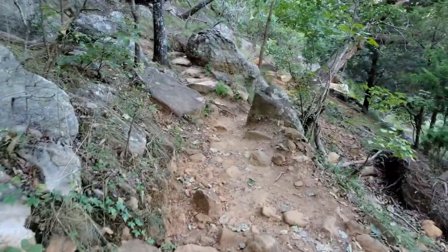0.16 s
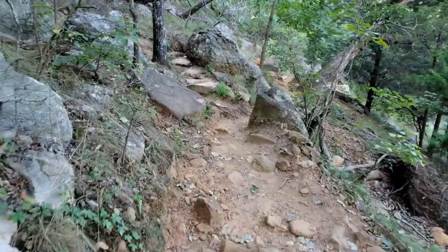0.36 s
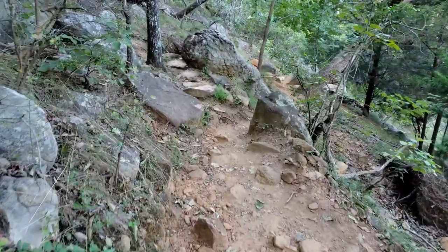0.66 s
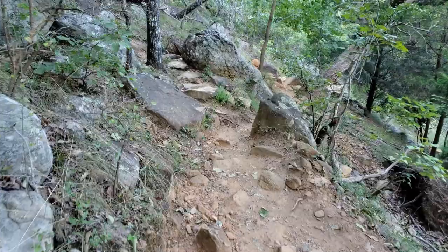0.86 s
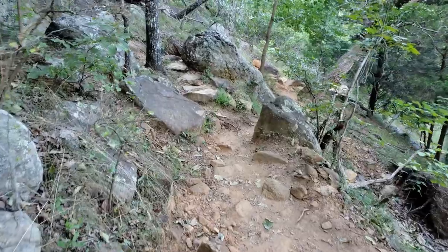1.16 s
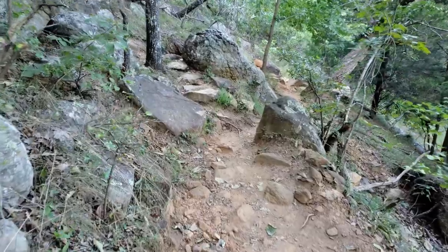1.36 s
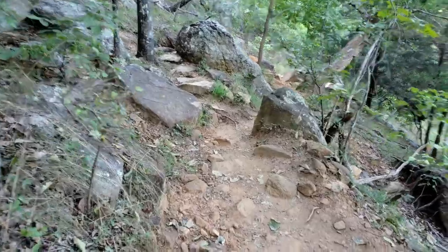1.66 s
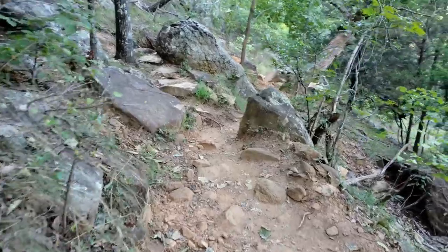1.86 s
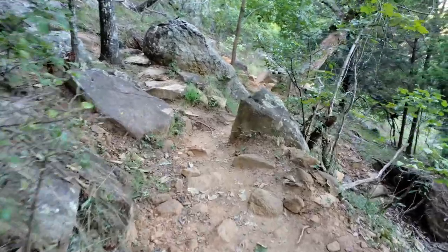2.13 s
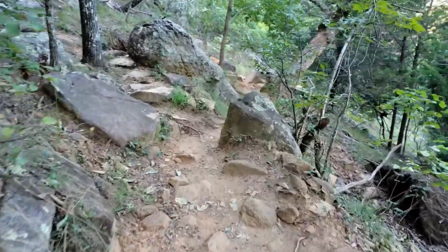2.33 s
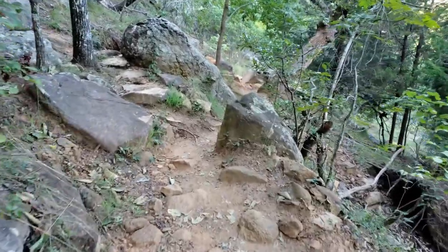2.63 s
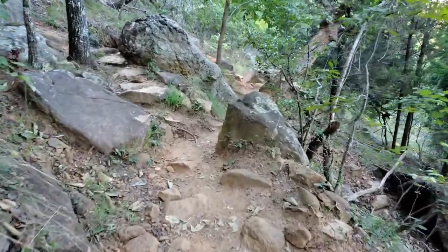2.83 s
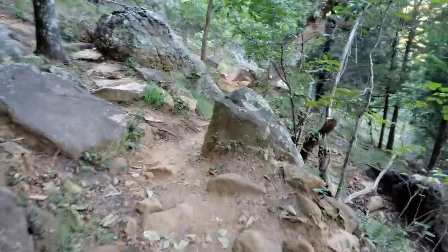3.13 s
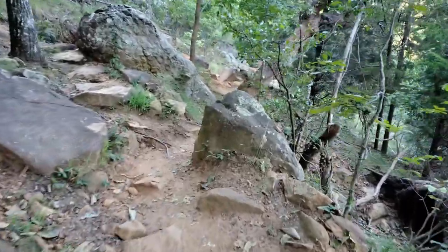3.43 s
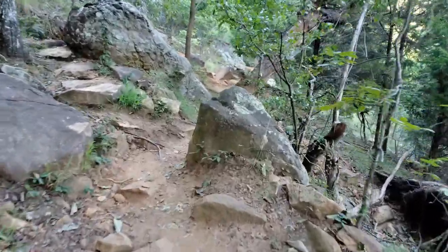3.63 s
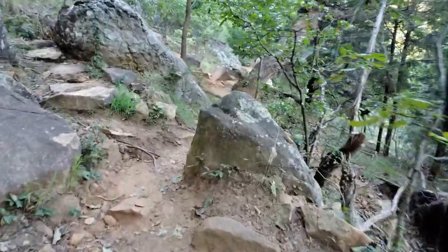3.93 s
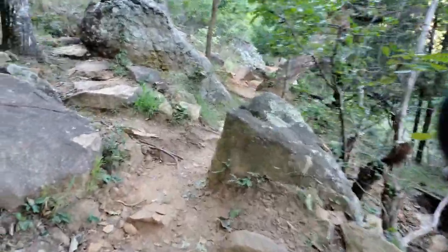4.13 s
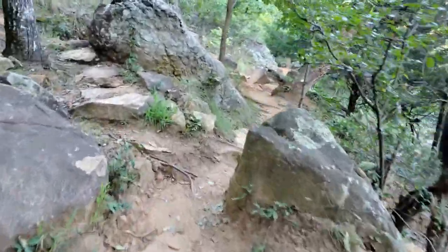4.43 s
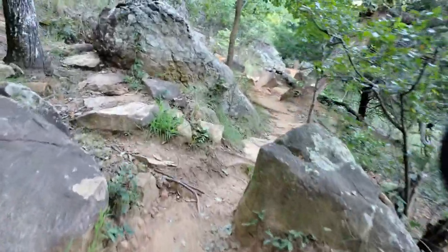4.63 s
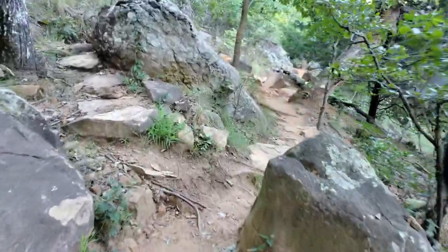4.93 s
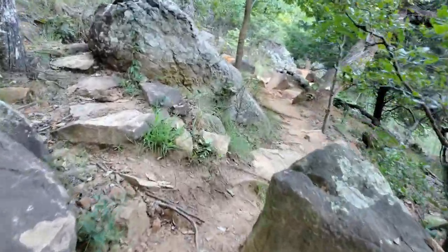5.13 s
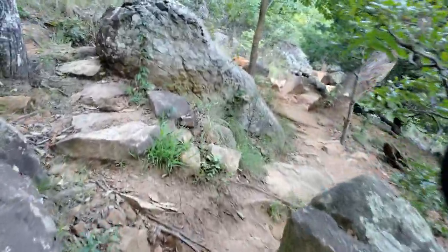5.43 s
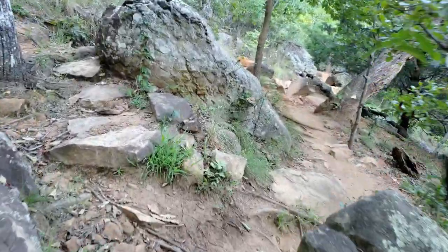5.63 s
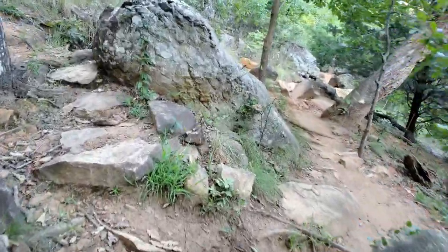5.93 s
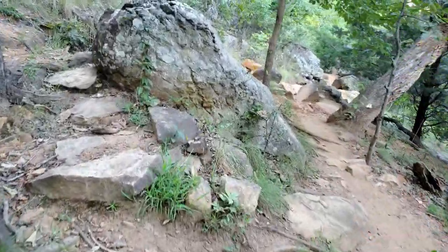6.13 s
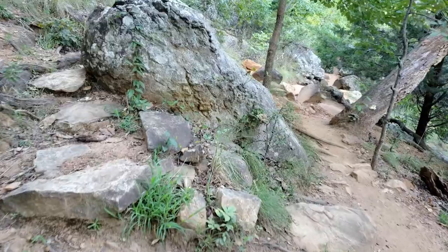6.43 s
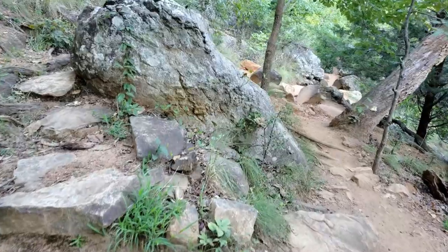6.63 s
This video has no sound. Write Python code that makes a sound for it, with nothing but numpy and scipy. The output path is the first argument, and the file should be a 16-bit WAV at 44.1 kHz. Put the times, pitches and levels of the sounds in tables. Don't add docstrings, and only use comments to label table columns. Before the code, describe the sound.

Songbirds whistle gliding notes and quick trills through echoing woods while boots crunch over gritty soil, gravel and knocking stones.

```python
import sys
import numpy as np
from scipy import signal
from scipy.fft import rfft, irfft, next_fast_len
from scipy.io import wavfile
from scipy.ndimage import uniform_filter1d

SR = 44100
rng = np.random.default_rng(int(sys.argv[2]) if len(sys.argv) > 2 else 0)


def pcm_store(signal):
    levels = np.round(np.clip(np.atleast_2d(signal), -1, 1) * 32767)
    wavfile.write(sys.argv[1], SR, levels.astype(np.int16).T)


def attenuation_scalar(level_db):
    decades = np.asarray(level_db, float) / 20
    return 10 ** decades


N = 298746


def birds():
    direct, echo = np.zeros((2, N)), np.zeros(N)
    leaves = wander(count=4, size=130)
    short_notes(direct, echo, leaves)
    figures(direct, echo, leaves)
    repeated_syllables(direct, echo, leaves)
    far_buzz(echo)
    return direct + forest(echo)


def short_notes(direct, echo, leaves):
    near_held = [(0.756, 0.049, 4794, 4750, -42), (0.853, 0.039, 4716, 4640, -30.5),
                 (1.278, 0.07, 4740, 4557, -30), (1.385, 0.075, 4600, 4546, -27)]
    near_flicks = [(1.485, 0.057, 4605, 5090, -27), (1.593, .04, 4497, 5470, -25),
                   (1.685, 0.046, 4496, 5230, -25.5)]
    near_falls = [
        (1.938, 0.029, 4364, 4330, -21.5),
        (1.975, 0.0253, 4300, 3540, -24),
        (2.068, 0.037, 4450, 5810, -31),
    ]
    right_held = [(3.588, 0.063, 4740, 4460, -41.5), (6.387, 0.071, 7750, 7490, -50)]
    right_drops = [(3.41, 0.127, 7356, 6080, -44), (6.614, 0.1, 7590, 6510, -51.5)]
    right_strokes = [(1.654, .062, 7180, 6880, -49), (5.973, .022, 5670, 5580, -53),
                     (1.921, 0.033, 7350, 5430, -46), (2.255, 0.027, 7330, 6490, -50),
                     (2.319, 0.022, 4700, 3580, -52), (4.45, 0.025, 5460, 3740, -43),
                     (4.832, 0.028, 8380, 7250, -49), (6.16, 0.021, 4800, 3610, -49.5),
                     (6.468, 0.027, 7420, 6760, -49.5)]
    deep_middle = [(0.47, 0.09, 8650, 8480, -69), (0.38, 0.18, 7650, 7800, -74),
                   (0.709, 0.04, 6590, 6500, -51.5), (0.87, 0.074, 2710, 2750, -61),
                   (3.668, 0.022, 2960, 3040, -48), (3.695, 0.03, 3450, 4100, -40.5),
                   (4.405, 0.0197, 4100, 3260, -40.5), (4.434, 0.019, 3200, 3000, -44),
                   (4.365, 0.034, 5200, 5000, -57), (6.656, 0.027, 5360, 4800, -55)]
    deep_left = [(1.678, 0.027, 3620, 3850, -53), (1.811, 0.048, 3673, 3556, -44.5)]
    # bend (power of time), swell_db (start to end), left_right_db, echo_db
    manners = [
        (0.42, -3.5, -1.5, -3.5),
        (2.62, 2.5, -1, -4.5),
        (1, -5, 3.5, -5.5),
        (0.53, -1, -11, 3),
        (3.2, 11, -23, 5),
        (1.1, 8.5, -14, -1),
        (1.12, 3.5, 1.5, 6),
        (0.94, -3, 15, -4),
    ]
    kinds = [near_held, near_flicks, near_falls, right_held, right_drops, right_strokes, deep_middle, deep_left]
    for notes, (bend, swell_db, pan_db, echo_db) in zip(kinds, manners):
        for note in notes:
            whistle(direct, echo, leaves, glide(*note, bend, swell_db), pan_db, echo_db)


def figures(direct, echo, leaves):
    # time_s, pitch_hz, level_db
    slide = [(.995, 8610, -45), (1.012, 8556, -42.5), (1.08, 8320, -32), (1.16, 7820, -32.5),
             (1.205, 7640, -37), (1.219, 7605, -28.5), (1.24, 7510, -40)]
    arch = [(5.92, 7900, -52), (5.933, 7440, -43), (5.975, 7760, -37), (6.0, 7750, -44), (6.025, 7170, -45)]
    dip = [(6.233, 6390, -54), (6.244, 6700, -41.5), (6.263, 5590, -41), (6.284, 5500, -43.5),
           (6.303, 5960, -43), (6.329, 5940, -47)]
    hook = [(4.256, 6050, -49), (4.272, 6630, -37.5), (4.287, 6860, -32), (4.316, 7130, -41),
            (4.365, 7370, -43.5), (4.39, 7460, -40.5)]
    plateau = [(4.601, 6040, -46), (4.616, 6190, -40), (4.644, 6293, -38.5), (4.686, 6280, -44)]
    sag = [(6.077, 4380, -47), (6.093, 4190, -48), (6.11, 3970, -48), (6.129, 3880, -50),
           (6.155, 3910, -59)]
    arched = [(.59, 2103, -58), (0.629, 2160, -55.5), (0.669, 2247, -53), (0.711, 2177, -64),
              (.8, 2180, -62)]
    droop = [(1.0, 2690, -60), (1.071, 2614, -65), (1.15, 2620, -64), (1.23, 2634, -52.5),
             (1.28, 2575, -60), (1.35, 2530, -63)]
    crest = [(1.772, 5380, -34), (1.795, 5810, -37.5), (1.82, 6240, -32), (1.848, 6124, -33),
             (1.87, 5950, -48), (1.914, 5750, -40)]
    low_pair = [(3.082, 2690, -53), (3.112, 2630, -53), (3.126, 2650, -64), (3.14, 2634, -55),
                (3.155, 2660, -57)]
    falling_hold = [(3.202, 7240, -42), (3.217, 6970, -34.5), (3.25, 7110, -40), (3.284, 7070, -43),
                    (3.314, 6600, -37.5), (3.344, 5870, -45)]
    # left_right_db, echo_db
    places = [(-12, 0.5), (-11.5, -5.5), (-23, 0), (-21.5, 3.5), (-16.5, -1), (-17, 3), (-8, 4),
              (8.5, -2.5), (-1.5, -4), (2, -4), (-22, 5)]
    sung = [slide, arch, dip, hook, plateau, sag, arched, droop, crest, low_pair, falling_hold]
    for rows, (pan_db, echo_db) in zip(sung, places):
        whistle(direct, echo, leaves, rows, pan_db, echo_db)


def repeated_syllables(direct, echo, leaves):
    # time_s, pitch_hz, level_db
    quick_sweep = [(0.0, 7710, 5), (0.015, 7640, 0), (0.03, 7030, 5), (0.045, 5640, 10), (0.065, 4400, 6.5),
                   (0.08, 3680, 3)]
    wide_sweep = [(0.0, 7950, -8), (0.012, 8250, -5), (0.024, 8120, -4), (0.045, 7100, 3), (0.056, 5820, 7),
                  (0.069, 4850, 0.5), (0.08, 4380, -1), (0.086, 4200, 9)]
    rise = [(0.0, 3076, 1), (0.02, 3140, 0.5), (0.036, 3600, 6.5), (0.05, 4050, 6), (0.062, 4460, -1)]
    trill_high = [(0.0, 3623, -6), (0.012, 3730, -2.5), (0.03, 4030, 1.5)]
    trill_low = [(0.0, 2873, -1.7), (0.019, 2640, -2)]
    # first_start_s, last_start_s, period_s
    series = [
        (2.398, 2.93, .133),
        (4.905, 5.606, .1752),
        (3.085, 3.475, .195),
        (3.727, 4.187, .092),
        (3.801, 4.122, .064),
    ]
    # first_level_db, growth_db (each repeat), left_right_db, echo_db
    levels = [
        (-53, 0.42, -15, -0.5),
        (-45, -0.1, -10, -3),
        (-52.5, 3, 0, 4),
        (-41.5, 0.26, -15, 0.5),
        (-44, -0.3, -5, 1),
    ]
    shapes = [quick_sweep, wide_sweep, rise, trill_high, trill_low]
    for shape, (first, last, period), (db, growth_db, pan_db, echo_db) in zip(shapes, series, levels):
        for k in range(round((last - first) / period) + 1):
            rows = np.array(shape) + [first + k * period, 0, db + k * growth_db]
            whistle(direct, echo, leaves, rows, pan_db, echo_db)


def far_buzz(echo):
    starts = [0, .01, .111, 1.655, 1.656, 1.8, 2.294, 3.041, 3.623, 4.196, 4.336, 4.36, 4.47, 4.75, 5.096]
    # length_s, pitch_hz, span_hz, level_db
    far = [(0.18, 2290, 2200, -57.5), (0.29, 7200, 300, -66), (0.91, 7000, 250, -67),
           (0.053, 3500, 520, -47), (0.58, 3230, 710, -56), (0.05, 3620, 490, -50), (0.53, 7200, 2700, -52),
           (.13, 4200, 1230, -55), (0.62, 6900, 3400, -48.5), (0.099, 2973, 920, -40),
           (0.092, 4230, 2700, -42.5), (0.045, 4800, 710, -54), (0.15, 3060, 500, -55),
           (0.055, 4700, 850, -51), (0.63, 7000, 3200, -52.5)]
    # start_s, length_s, pitch_hz, span_hz, level_db
    climber = (4.67, .3, 2800, 1100, -42)
    rows = [(s, *row) for s, row in zip(starts, far)] + [climber]
    climbs_hz_per_s = [0] * len(far) + [5600]
    warbles = wander(count=len(rows), size=140)
    for (s, length, centre_hz, span_hz, db), climb, warble in zip(rows, climbs_hz_per_s, warbles):
        t = np.arange(0, length, 1 / SR)
        hz = centre_hz + climb * t + span_hz * warble[:len(t)] / 4
        tone = np.sin(2 * np.pi * np.cumsum(hz) / SR)
        add(echo, s, attenuation_scalar(db) * tone * signal.windows.tukey(len(t), .6))


def glide(start, length, from_hz, to_hz, db, bend, swell_db):
    u = np.linspace(0, 1, 24)
    hz = from_hz + (to_hz - from_hz) * u ** bend
    return np.transpose([start + length * u, hz, db + swell_db * (u - .5)])


def whistle(direct, echo, leaves, rows, pan_db, echo_db):
    s, hz, db = np.transpose(rows)
    t = np.arange(s[0] - .006, s[-1] + 0.0049, 1 / SR)
    pitch = uniform_filter1d(np.interp(t, s, hz), 150)
    turn = 2 * np.pi * np.cumsum(pitch) / SR
    fade = signal.windows.tukey(len(t), min(0.016 * SR / len(t), 1))
    level = np.sqrt(2) * attenuation_scalar(np.interp(t, s, db)) * fade
    straight = 1 / np.sqrt(1 + attenuation_scalar(2 * echo_db))
    spot = (1.1 * pitch + 6000 * t + 9000 * s[0]).astype(int)
    scatter = leaves[:, spot] * (.15 + .45 * straight * attenuation_scalar(echo_db))
    paths = 1 + scatter[:2] + 1j * scatter[2:]
    ears = attenuation_scalar([[pan_db / 2], [-pan_db / 2]]) * np.exp(1j * (turn + np.array([[2.9], [0]])))
    overtone = (ears ** 2 / abs(ears)).imag
    add(direct, t[0], level * straight * (paths * ears).imag)
    add(direct, t[0], attenuation_scalar(-44) * level * straight * overtone)
    add(echo, t[0], level * straight * attenuation_scalar(echo_db) * np.sin(turn))


def forest(x):
    # pitch_hz, time_to_fall_60_db_s
    echo_time = [(2500, 2.18), (4500, 2.03), (6500, 2.28), (8500, 1.72)]
    taps = np.zeros((2, 2 * SR))
    at = np.arange(100, 2 * SR - 24, 24) + rng.integers(0, 24, (2, (2 * SR - 101) // 24))
    np.put_along_axis(taps, at, rng.standard_normal(at.shape), 1)
    hz, t, z = signal.stft(taps, SR, nperseg=256)
    fall = attenuation_scalar(-60 * t / read(echo_time, hz)[:, None]) * (1 + 3.64 * np.exp(-t / 0.03))
    stands = evened(uniform_filter1d(uniform_filter1d(rng.standard_normal(z.shape), 3, 1), 9, 2))
    fall = fall * attenuation_scalar(4.34 * stands)
    tail = signal.istft(z * fall, SR, nperseg=256)[1]
    mid, side = signal.fftconvolve(x[None], tail / np.linalg.norm(tail[0]), axes=1)[:, :N]
    mid, side = attenuation_scalar(-0.5) * mid, attenuation_scalar(1.5) * side
    return np.array([attenuation_scalar(0.5) * (mid + side), attenuation_scalar(1.0) * (mid - side)])


def boots():
    # start_s, length_s, soil_db, gravel_db, grit_db
    scuffs = [(0.282, 0.15, -61.5, -62.5, -102), (0.786, 0.082, -59, -71, -101),
              (0.884, 0.15, -54.5, -59, -61), (1.092, 0.24, -69, -70, -55), (1.343, 0.36, -60.5, -69, -61),
              (1.561, 0.037, -55, -47.5, -89), (1.946, 0.18, -59.5, -67, -61), (2.1, 0.18, -58, -59.5, -66),
              (2.66, 0.091, -52.5, -65, -78), (2.762, 0.1, -52.5, -58.5, -90),
              (3.167, 0.052, -47, -68, -92), (3.285, 0.28, -80, -65, -67.5), (3.64, 0.26, -67, -72, -66),
              (3.805, 0.096, -58, -61.5, -68), (4.123, 0.16, -63, -66.5, -72),
              (4.436, 0.29, -61.5, -61, -64), (4.624, 0.067, -50.5, -68, -55),
              (4.948, 0.15, -48, -58, -57.5), (5.088, 0.23, -54, -95, -60), (5.585, 0.18, -55.5, -67, -92),
              (5.808, 0.16, -56.5, -65.5, -60), (6.082, 0.34, -55.5, -77, -81),
              (6.205, 0.19, -65, -68, -59), (6.393, 0.13, -56.5, -99, -68)]
    # pitch_hz, level_db (per Hz)
    soil_tone = [(150, -5.5), (300, -0.5), (500, 0.5), (900, -1), (1500, -7), (3000, -21)]
    # pitch_hz, level_db (per Hz)
    gravel_tone = [(600, -54), (1300, -8.5), (2200, -11), (3500, -5.5), (6000, -20), (9000, -46)]
    # pitch_hz, level_db (per Hz)
    grit_tone = [(2500, -12), (5000, 9.5), (9000, 5.5), (10500, -3.5), (12200, 4.5), (13500, 1),
                 (16000, -14)]
    weight = np.zeros((3, N)) + attenuation_scalar([[-68], [-72], [-71]])
    for s, length, *db in scuffs:
        t = np.arange(0, length + 0.36, 1 / SR)
        onset_s = np.array([[.008], [.008], [.3 * length]])
        press = np.minimum(t / onset_s, 1) * np.exp(-(t / length) ** 3)
        settling = np.minimum(press / .1 + t / length, 1) * np.exp(-t / 0.085)
        add(weight, s, attenuation_scalar(db)[:, None] * (press + 0.047 * settling))
    clumps_db = np.array([[3.5], [3.5], [1.5]]) * wander(count=3, size=400)
    weight = weight * attenuation_scalar(clumps_db)
    soil = grains(soil_tone, weight[0] * attenuation_scalar(-2.5), per_s=170, spread_db=1.2, length_s=0.0089, smooth=1.0)
    gravel = grains(gravel_tone, weight[1] * attenuation_scalar(0.5), per_s=500, spread_db=0.4, length_s=0.00046, smooth=3.1)
    grit = grains(grit_tone, weight[2] * attenuation_scalar(2.5), per_s=1200, spread_db=2.6, length_s=.001, smooth=1.1)
    return soil + gravel + grit


def grains(spectrum, level, per_s, spread_db, length_s, smooth):
    hits = rng.random(N) < per_s / SR
    size = attenuation_scalar(spread_db * np.minimum(rng.exponential(1, N), 5)) * hits
    burst = np.exp(-np.arange(600) / (length_s * SR))
    shape = evened(signal.oaconvolve(size, burst)[:N]) + smooth
    mid, side = colour(shape * rng.standard_normal((2, N)), spectrum)
    return pair(evened(mid) * level, evened(side) * level)


def stones():
    # time_s, peak_db, pitch_hz, ring_cycles
    knocks = [(1.47, -38, 644, 2.1), (1.5136, -35.5, 1390, 2.7), (1.724, -36.5, 377, 5.4),
              (1.975, -47, 294, 14), (2.109, -45, 630, 2.4), (2.153, -38, 720, 2.3), (2.661, -46, 281, 6.4),
              (2.71, -40, 244, 2.7), (2.97, -42, 860, 1.4), (3.018, -40, 1150, 2.3), (3.169, -34.5, 463, 5),
              (3.283, -44.5, 1110, 15), (3.499, -45, 1080, 7.5), (4.445, -47, 500, 11),
              (4.645, -49, 530, 11), (4.96, -44, 626, 9.6), (5.022, -43, 780, 3.7),
              (5.114, -29.5, 540, 4.3), (5.207, -38, 642, 18), (5.273, -26, 960, 2.7),
              (5.677, -36, 813, 2.9), (5.838, -44.5, 720, 8.7), (6.088, -30.5, 1230, 1.7),
              (6.257, -31, 1040, 3.5), (6.293, -38, 786, 5.2), (6.398, -63, 483, 4.5),
              (6.424, -36.5, 526, 2.2)]
    # time_s, peak_db, pitch_hz, ring_cycles
    thumps = [
        (0.775, -50, 105, 2),
        (1.974, -49.5, 106, 8.5),
        (2.658, -41, 109, 1.7),
        (3.168, -49, 86.1, 3.3),
        (5.108, -36.5, 161, 2),
    ]
    # time_s, peak_db, left_right_db
    ticks = [(0.2919, -59, -1.0), (0.9479, -46, -11), (1.0856, -44, -4), (1.417, -41, -4),
             (1.9781, -49, -7), (2.0629, -41, -8.5), (2.0734, -40, -11), (2.145, -29.5, -11),
             (2.662, -48, -2), (3.0022, -47, 6), (3.0232, -44, -6), (3.1714, -58, 0.5), (3.2896, -45, 2),
             (3.4981, -44, -1), (3.673, -40, -4.5), (3.693, -51, 0.5), (3.8089, -50, -9),
             (4.1222, -46, 1.0), (4.6315, -47, -3), (4.642, -39, -4), (4.966, -52, 9), (4.9668, -36, 2),
             (5.0182, -44.5, 0.5), (5.0865, -38, -1.5), (5.2681, -40, -4.0), (5.7939, -63, 0),
             (5.8163, -44, -9), (5.8415, -41, -1.0), (5.9066, -39, -7), (5.9185, -46, 0.5),
             (5.9273, -32, 2.0), (6.0723, -49, 0.5), (6.0907, -41, -0.5), (6.3037, -39, 2), (6.397, -36, 2),
             (6.4414, -40, 4), (6.5851, -54.5, 2.5), (6.5851, -46, 0.5), (6.6689, -45, 2.5)]
    # pitch_hz, level_db
    tick_tone = [(3000, -7), (6000, 5), (8500, 2.5), (10300, -4.5), (12200, 9.5), (14000, -1), (16000, -1)]
    # time_s, peak_db, left_right_db
    clods = [(0.359, -57, 2.5), (0.392, -50, 1.0), (0.799, -52, 0.0), (0.934, -42, 0.0), (0.999, -51, 6),
             (1.204, -47, 6), (1.439, -52, 23), (2.199, -49, 2.0), (2.799, -53, 2.0), (3.185, -36, 4),
             (3.199, -42, 3.0), (3.258, -47, 9), (3.336, -43, 4), (3.354, -42.5, -1.0), (3.379, -43, -1),
             (3.751, -43, 5), (3.769, -49, -2), (3.874, -49, -11), (4.19, -52, -1), (4.48, -39.5, 0.0),
             (4.528, -41, 0.5), (4.989, -46, 1.5), (5.149, -58, -6), (5.636, -50, 3), (5.663, -38, 1.5),
             (5.711, -37, 2), (5.879, -45, -3), (6.126, -59, 4.5), (6.219, -40, 0)]
    # time_s, peak_db, left_right_db
    cracks = [(0.2944, -41, 10), (0.3273, -47, 11), (0.3977, -43, 6), (0.5992, -67, -5),
              (0.6271, -65, -5.5), (0.7364, -65, 2.0), (0.829, -45, 4), (0.8651, -47, -2), (0.886, -42, 5),
              (1.006, -39.5, 5), (1.2228, -45, 2), (1.397, -45.5, 6), (1.4368, -49, 7), (1.5126, -39.5, 5),
              (1.597, -38, 4), (2.2714, -47.5, 7), (2.6635, -55, 6), (2.684, -49, 6), (2.7713, -45, 10),
              (2.8177, -40, 8), (2.8406, -39.5, 5), (2.9728, -41.5, 5), (3.0182, -42.5, 5),
              (3.1669, -46, 1), (3.1704, -36, 0), (3.2836, -49, 9), (3.3849, -49, 2.5), (3.6697, -54, 7),
              (4.1372, -44, 1), (4.189, -56, 6), (4.4479, -41, 6), (4.6435, -47, -7), (4.9738, -49, 7),
              (5.0246, -37.5, 15), (5.1583, -53, 4), (5.2726, -50, 9), (5.5869, -49, 11),
              (5.6308, -59, 5.0), (5.6632, -51, 3.5), (5.6782, -44.5, 12), (5.9036, -43, -8),
              (6.0902, -41, 8), (6.1266, -63, -0.5), (6.1626, -50, 11), (6.2229, -48, 5.0),
              (6.2583, -40.5, 8), (6.3431, -65, -1.0), (6.397, -47, 2)]
    out, t = np.zeros((2, N)), np.arange(2500) / SR
    for s, db, hz, cycles in knocks + thumps:
        ring = np.sin(2 * np.pi * hz * t) + 0.073 * np.sin(2 * np.pi * 2.92 * hz * t)
        attack = 1 - np.exp(-t * hz * 2.5)
        knock = ring * attack * np.exp(-3.1 * t * hz / max(cycles, .5))
        add(out, s, attenuation_scalar(db) * knock / abs(knock).max() * np.ones((2, 1)))
    bright = snaps(ticks, low_hz=3300, high_hz=14200, rise_s=0.00088, lift_db=-1.4, side_db=-.5)
    add(out, 0, colour(bright, tick_tone))
    add(out, 0, snaps(clods, low_hz=510, high_hz=1340, rise_s=0.00184, lift_db=-1.7, side_db=-16))
    add(out, 0, snaps(cracks, low_hz=810, high_hz=3400, rise_s=0.00126, lift_db=0.42, side_db=0))
    return out


def snaps(rows, low_hz, high_hz, rise_s, lift_db, side_db):
    out, t = np.zeros((2, N)), np.arange(900) / SR
    band = signal.butter(2, [low_hz, min(high_hz, 16000)], "band", fs=SR)
    swell = t / rise_s * np.exp(1 - t / rise_s)
    for (s, db, pan_db), noise in zip(rows, rng.standard_normal((len(rows), 2, len(t)))):
        mid, side = signal.lfilter(*band, noise * swell)
        mid, side = mid / abs(mid).max(), attenuation_scalar(side_db) * side / abs(side).max()
        ears = attenuation_scalar(db + lift_db + np.array([[pan_db], [-pan_db]]) / 2)
        add(out, s - rise_s, ears * [mid + side, mid - side])
    return out


def air():
    # pitch_hz, level_db (per Hz)
    air_tone = [(25, -52), (42, -0.5), (93, 4), (125, -3.5), (191, -8.5), (234, -11.5), (331, -12.5),
                (751, -21.5), (810, -29.5), (2190, -22.5), (3690, -24.5), (8590, -27), (16000, -33)]
    frames = N // 256 + 5
    a, b, c, d, patches = rng.standard_normal((frames, 513, 5)).T
    patches = evened(uniform_filter1d(uniform_filter1d(patches, 8, 0), 16, 1))
    spectra = np.array([a + 1j * b, c + 1j * d]) * attenuation_scalar(2.1 * patches)
    hiss = signal.istft(spectra, nperseg=1024, noverlap=768)[1]
    mid, side = colour(hiss[:, :N], air_tone)
    return attenuation_scalar(-54.5) * pair(evened(mid), evened(side))


def pair(mid, side):
    # pitch_hz, side_minus_middle_db
    width = [(30, -2), (80, -23), (180, -6.5), (550, -7.5), (1650, -1), (4970, 1), (15000, 0.5)]
    side = colour(side, width)
    return np.array([mid + side, mid - side])


def colour(x, points):
    size = next_fast_len(N)
    gain = attenuation_scalar(read(points, np.fft.rfftfreq(size, 1 / SR)))
    return irfft(rfft(x, size) * gain, size)[..., :N]


def read(points, hz):
    f, value = np.transpose(points)
    return np.interp(np.log(hz + 1), np.log(f + 1), value)


def wander(count, size):
    return evened(uniform_filter1d(uniform_filter1d(rng.standard_normal((count, N)), size), size))


def evened(x):
    return x / np.sqrt(np.mean(x ** 2) + 1e-20)


def add(mix, s, sound):
    part = mix[..., round(s * SR):][..., :sound.shape[-1]]
    part += sound[..., :part.shape[-1]]


def scene():
    return birds() + boots() + stones() + air()


def masked(x):
    hz, t, z = signal.stft(x, SR, nperseg=2048, noverlap=1024, window="cosine")
    bands = z[:, :1024].reshape(2, 64, 16, -1)
    level_db = 10 * np.log10((abs(bands) ** 2).mean(2) + 1e-16)
    band = np.arange(64)[:, None]
    gap = band - band.T
    slope_db = np.where(gap > 0, 2.1 * gap, -6.5 * gap)
    reach_db = -38 + .5 * np.minimum(band, 27) - slope_db
    lasting = signal.lfilter([.3], [1, -.7], attenuation_scalar(2 * level_db.max(0)))
    mask_db = (10 * np.log10(lasting)[None] + reach_db[:, :, None]).max(1)
    keep = 1 / (1 + np.exp(np.clip(mask_db - level_db, -30, 30) / .8))
    keep[:, :5] = 1
    keep[:, 46:] = 0
    z[:, :1024] = (bands * keep[:, :, None]).reshape(2, 1024, -1)
    return signal.istft(z, SR, nperseg=2048, noverlap=1024, window="cosine")[1][:, :N]


def top_cut(x):
    return signal.sosfilt(signal.butter(12, 15850, fs=SR, output="sos"), x)


def record(dry):
    mix = masked(dry)
    return top_cut(mix)


dry = scene()
out = record(dry)
pcm_store(out)
```